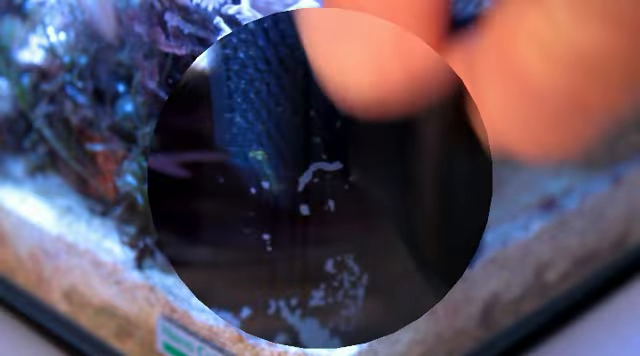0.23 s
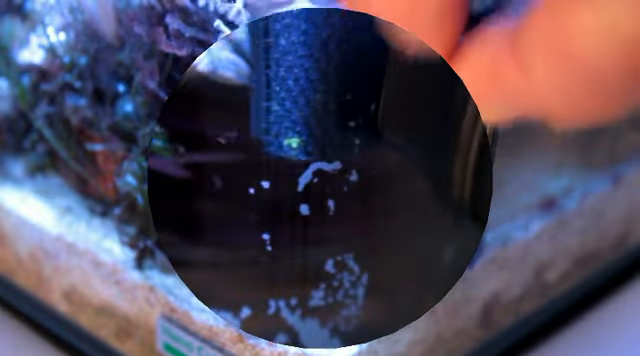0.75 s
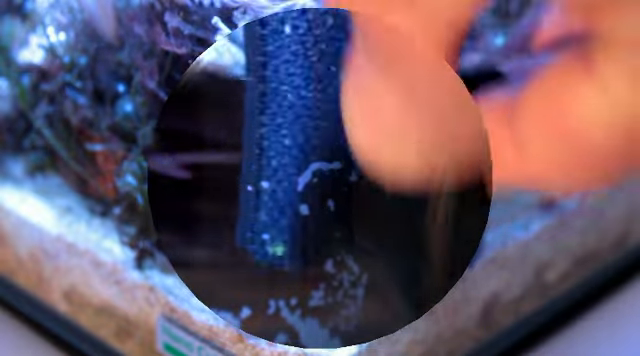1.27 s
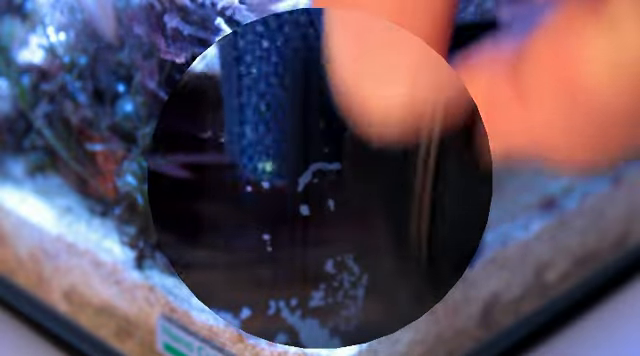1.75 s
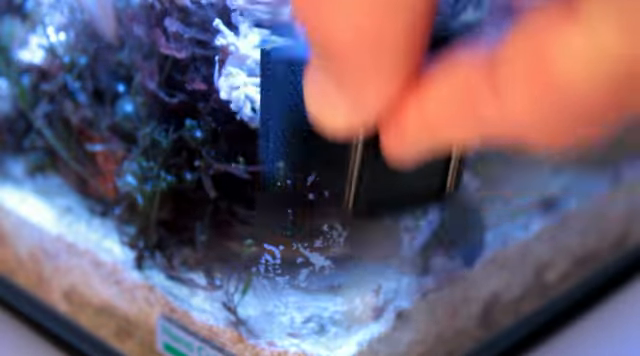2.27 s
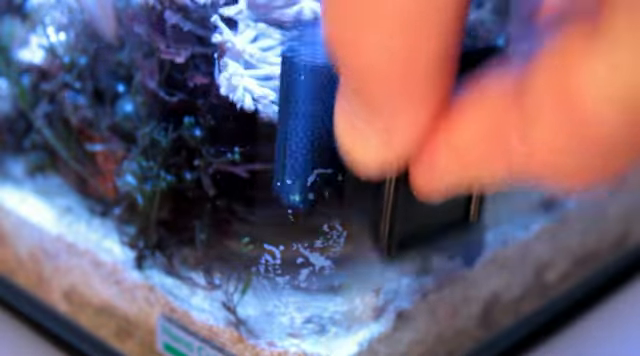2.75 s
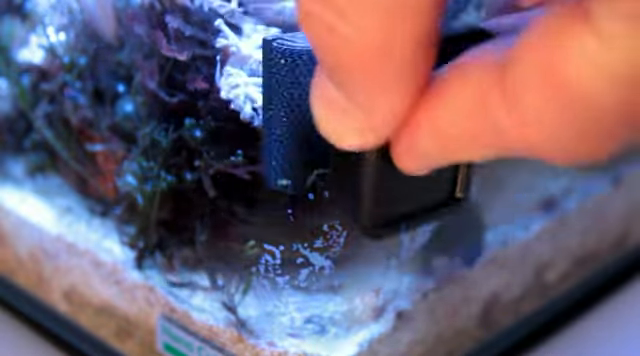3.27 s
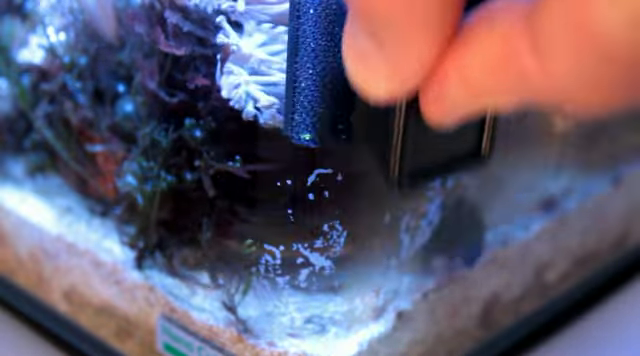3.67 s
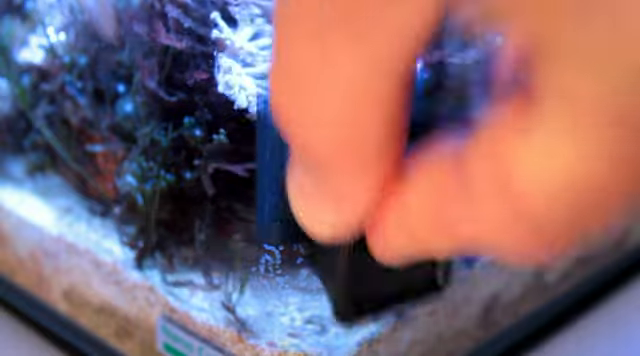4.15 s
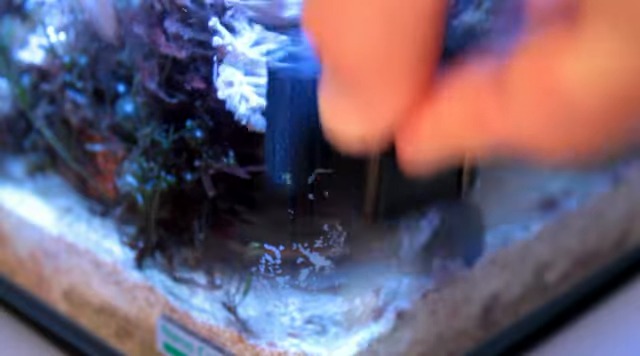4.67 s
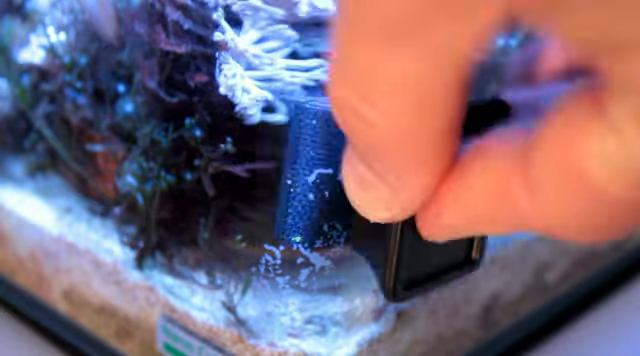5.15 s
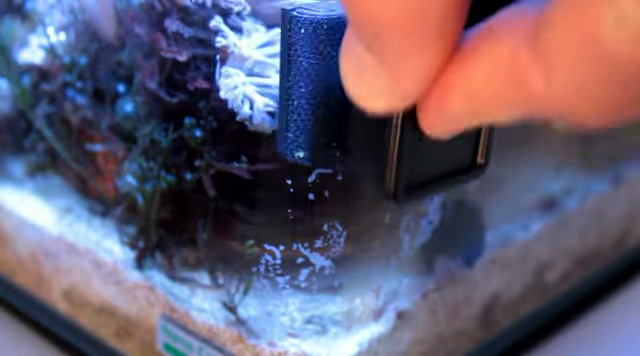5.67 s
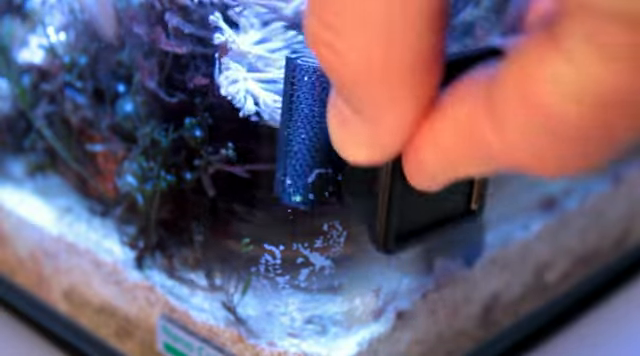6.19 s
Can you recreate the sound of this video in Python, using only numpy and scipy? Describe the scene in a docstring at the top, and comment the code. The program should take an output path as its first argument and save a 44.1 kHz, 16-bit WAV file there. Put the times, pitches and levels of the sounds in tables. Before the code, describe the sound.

A magnetic cleaner rasps in quick, crunchy strokes over crusted aquarium glass, pausing for low juddering drags and water plops, above a soft pump hum.

```python
"""An aquarium pane, heard close by, with a small magnetic cleaner working up and down it.
Each quick stroke bites, crushes hard algae crust in a short rasp of tiny fractures and rebounds.
Chips snap off as noise bursts, and band-pass modes let the glass ring briefly.
Midway the magnet drags slowly: stick and slip shakes low tank modes, and the pad rubs and squeaks.
A few drops plop as decaying, rising sines; a pump hums in steady sines under the hiss of the room."""
import sys
import numpy as np
from scipy import signal
from scipy.fft import rfft, irfft
from scipy.io import wavfile
from scipy.ndimage import uniform_filter1d

SR = 44100
rng = np.random.default_rng(int(sys.argv[2]) if len(sys.argv) > 2 else 0)


def master(y):
    """Save y as 16-bit WAV."""
    cut = np.clip(np.atleast_2d(y).T, -1, 1)
    pcm = np.round(cut * 32767)  # scale
    wavfile.write(sys.argv[1], SR, pcm.astype(np.int16))


N = 283428
T = np.arange(N) / SR

# slow drags of the magnet: (middle [s], half-power length [s], relative rasp level [dB], judder level [dB])
DRAGS = [(2.568, .06, -59, -56), (2.708, .04, -54, -61), (3.038, 0.053, -57.5, -68),
         (3.128, 0.059, -50, -46), (3.28, 0.12, -62.5, -57), (3.627, 0.038, -52, -50),
         (3.685, 0.049, -44, -44.5)]


def undb(db):
    """Level to amplitude: 20 dB is a factor of ten."""
    return 10 ** (np.asarray(db) / 20)


def unit(x):
    """Normalisation to a root-mean-square of 1."""
    return x / np.sqrt(np.mean(x ** 2))


def noise():
    """White noise: independent Gaussian samples, equal power at all frequencies."""
    return rng.standard_normal(N)


def walk(rate):
    """Slow random modulation of rms 1: smoothed random steps, rate per second."""
    size = int(SR / rate)
    steps = np.repeat(rng.standard_normal(N // size + 1), size)
    return unit(uniform_filter1d(steps, size)[:N])


def through(x, response):
    """Linear filtering: convolution with an impulse response scaled to unit energy."""
    return signal.fftconvolve(x, response / np.linalg.norm(response))[:N]


def colour(points, size=1024):
    """Minimum phase: the folded cepstrum turns a (frequency [Hz], level [dB]) curve into a causal response."""
    hz, db = np.transpose(points)
    bins = np.fft.rfftfreq(size, 1 / SR)
    log_gain = np.log(undb(np.interp(np.log(bins + 1), np.log(hz), db)))
    cepstrum = irfft(log_gain)[:size // 2]
    cepstrum[1:] *= 2
    response = irfft(np.exp(rfft(cepstrum, size)))
    return response / np.linalg.norm(response)


def fade(t, t60):
    """Exponential decay of a damped system, 60 dB down after t60 seconds."""
    return np.exp(-np.log(1000) * t / t60)


def swell(middle, length, db):
    """Gaussian envelope of one pass; length is its full width at half power."""
    return undb(db) * .5 ** (2 * ((T - middle) / length) ** 2)


def strokes(rows):
    """Power addition: the joint envelope of several independent passes."""
    return np.sqrt(sum(swell(*row) ** 2 for row in rows))


def drag_effort():
    """Envelope of the slow drags, their powers added."""
    return strokes([(middle, length, db) for middle, length, db, _ in DRAGS])


def grains(rate, spread_db):
    """Shot noise: tiny fractures at random moments, of either sign and uneven size; rms 1."""
    size = undb(spread_db * np.clip(noise(), -2, 2))
    happens = rng.random(N) < rate / SR
    return unit(happens * size * np.sign(noise()))


def burst(t60):
    """Transient: up to 25 ms of exponentially decaying noise, of unit energy."""
    t = T[:SR // 40]
    x = rng.standard_normal(len(t)) * fade(t, t60)
    return x / np.linalg.norm(x)


def resonance(x, hz, width):
    """One damped mode: a second-order band-pass with gain 1 at its centre."""
    return signal.lfilter(*signal.iirpeak(hz, hz / width, fs=SR), x)


def add(out, s, sound):
    """Superposition: mix a sound in from time s."""
    part = out[max(int(s * SR), 0):][:len(sound)]
    part += sound[:len(part)]


def room(x, wet_db, t60):
    """Reverberation: direct sound plus a short, diffuse wash from the tank and nearby walls."""
    t = T[:SR // 2]
    build_up = 1 - np.exp(-t / 0.00051)
    wash = rng.standard_normal(len(t)) * fade(t, t60) * build_up
    return x + undb(wet_db) * through(x, wash)


def scraping(crumble_db, chip_db, snap_t60, coarse_hz, catch_db, contact_db):
    """Brittle fracture: strokes and drags crush crust and chips snap off, all exciting the pane's modes."""
    # quick strokes, about six a second while they last; each peaks one length after its start:
    # (start [s], half-power length [s], relative level [dB], relative rebound level [dB])
    # a rebound near -66 is lost in the room hiss
    stroke_table = [(0, 0.0057, -40, -43), (0.129, 0.023, -49.5, -51.5), (0.314, 0.016, -45.5, -54),
                    (0.447, 0.025, -37.5, -44.5), (0.621, 0.02, -40.5, -39), (0.797, 0.021, -41.5, -46.5),
                    (0.97, .018, -43.5, -60.5), (1.11, 0.023, -40.5, -53), (1.288, 0.019, -41.5, -73),
                    (1.447, 0.015, -46.5, -72), (1.611, 0.018, -41, -60), (1.901, .008, -41.5, -66),
                    (3.776, 0.021, -45.5, -49.5), (4.005, 0.028, -40.5, -54), (4.155, 0.016, -37.5, -51),
                    (4.297, .019, -42, -42), (4.458, 0.02, -37.5, -47), (4.596, 0.021, -41, -52),
                    (4.738, 0.018, -41, -65), (4.857, 0.02, -44.5, -58), (5.002, 0.02, -42.5, -44),
                    (5.153, 0.022, -40, -48), (5.313, .018, -40.5, -41), (5.477, 0.013, -50.5, -70),
                    (5.946, 0.018, -49, -62), (6.009, 0.016, -46, -76), (6.125, .018, -52.5, -73),
                    (6.316, 0.017, -50, -73.5)]
    # the clearest snaps: chips of crust snapping off, and the sharper bites of some rebounds: (time [s],
    # relative level [dB])
    chips = [(1.037, -51.5), (1.185, -48), (1.296, -44.5), (1.836, -52), (1.886, -49.5), (2.524, -48),
             (2.727, -44), (2.855, -54), (3.094, -49), (3.111, -48), (3.147, -42.5), (3.269, -45.5),
             (3.492, -52.5), (3.649, -38.5), (4.081, -47), (4.217, -44), (4.662, -43.5), (4.757, -38),
             (4.867, -41), (5.372, -40), (5.479, -43), (5.863, -47.5), (6.128, -47)]
    # spectrum of crumbling crust heard through the pane: (frequency [Hz], relative level [dB])
    crust_spectrum = [(300, -27), (1000, -31), (1600, -14.5), (2100, -8), (3100, -4), (3800, -1.5),
                      (4080, -3), (4400, 4.5), (5000, 3.5), (6300, -2), (6900, -8.5), (8000, -9),
                      (11000, -12.5), (16000, -17)]
    # modes of the pane and blade: (frequency [Hz], mean gain on the rasp [dB], width [Hz])
    pane_modes = [(2093, 4, 30), (2464, 5.5, 39), (2600, -26, 18), (3060, -1.5, 170), (3590, -12, 35),
                  (3850, -9, 83), (4280, 0.5, 67), (4690, -47, 110), (4960, -21, 120), (6280, -2, 137),
                  (7770, -6, 110)]
    bite_db = -5  # snap as the edge bites, relative to its pass
    rebound_lag_s, rebound_s = .05, 0.014  # delay after the peak, and length of the second rasp
    stroke_coarse_db, drag_coarse_db = 1.3, -2  # quick strokes break coarser crust than slow drags
    flakes_per_s, flake_db = 70, -7  # smaller flakes break at random, relative to the crumbs

    # the edge catches and lets go every few milliseconds
    crumbs = unit(grains(rate=4000, spread_db=2.0) * undb(catch_db * walk(300)))
    flakes = through(grains(rate=flakes_per_s, spread_db=0.5), burst(snap_t60))
    crumbs += undb(flake_db) * flakes
    low_pass = signal.butter(3, coarse_hz, fs=SR, output="sos")
    coarse = signal.sosfiltfilt(low_pass, crumbs)
    fine = crumbs - coarse

    passes = [(s + length, length, db) for s, length, db, _ in stroke_table]
    passes += [(s + length + rebound_lag_s, rebound_s, db) for s, length, _, db in stroke_table]
    quick, slow = strokes(passes), drag_effort()
    force = fine * np.hypot(quick, slow)
    force += coarse * np.hypot(undb(stroke_coarse_db) * quick, undb(drag_coarse_db) * slow)
    force *= undb(crumble_db)

    # every quick pass and rebound opens with a snap, one length before its peak
    bites = [(middle - length, db + bite_db) for middle, length, db in passes]
    for s, db in [*bites, *chips]:
        add(force, s, undb(db + chip_db) * burst(snap_t60))

    rasp = through(force, colour(crust_spectrum))
    # as the blade travels, each mode gets a changing share
    ringing = sum(undb(db + contact_db * walk(6.5)) * resonance(rasp, hz, width)
                  for hz, db, width in pane_modes)
    return rasp + ringing


def pump(waver_db, waver_phase):
    """Periodic forcing: mains harmonics and rotor tones, wavering with the load on the impeller."""
    # hum of the pump: (frequency [Hz], mean peak level [dB])
    hum_tones = [(100, -70), (150, -63.5), (200, -48), (232.5, -67.5), (250, -66.5), (300, -63.5),
                 (400, -68.5), (602.5, -72.5)]
    hum = 0
    for hz, db in hum_tones:
        strength = undb(db + waver_db * walk(9))
        phase = 2 * np.pi * (hz * T + rng.random()) + waver_phase * walk(5)  # [rad]
        hum = hum + strength * np.sin(phase)
    return hum


def air(flicker_db):
    """Broadband turbulence: filtered noise as the wash of circulating water and room hiss."""
    # running water and room air: (frequency [Hz], relative level [dB])
    air_spectrum = [(20, -12), (40, -25.5), (58, -1), (75, -13.5), (125, -0.5), (160, -5.5), (205, 2.5),
                    (280, -6.5), (420, -10.5), (750, -14), (1400, -17), (4200, -18.5), (8000, -21.5),
                    (16000, -25)]
    air_db = -55  # level about which it flickers
    wash = unit(through(noise(), colour(air_spectrum, size=8192)))
    return undb(air_db + flicker_db * walk(14)) * wash


def brushing(patchy_db):
    """Sliding friction: patchy fine grains from the soft pad, band-passed for each drag, rub and squeak."""
    # the pad squeaks thinly: (middle [s], half-power length [s], level [dB], centre [Hz])
    squeaks = [(.223, 0.022, -53.5, 11800), (1.66, 0.015, -53, 8500), (2.127, .014, -54.5, 10000),
               (2.69, 0.03, -56, 7700), (3.848, 0.032, -50, 7260)]
    # the pad rubs over the pane: (middle [s], half-power length [s], level [dB], centre [Hz])
    rubs = [(.91, 0.065, -50, 1190), (1.2, 2.3, -64, 480), (1.237, 0.053, -54.5, 1230),
            (1.355, 0.06, -54, 1280), (1.463, 0.019, -53, 550), (3.04, 0.045, -56.5, 550)]
    rub_width, squeak_width = 0.62, 0.33  # width of each band-pass as a share of the centre
    grind_hz, grind_width_hz, grind_db = 1960, 1060, -8  # the pad grinds along with each drag
    hiss_hz, hiss_width_hz, hiss_db = 10200, 7000, -12.5  # and hisses finely

    friction = grains(rate=2000, spread_db=0.0) * undb(patchy_db * walk(110))

    def band(hz, width):
        """Cascaded resonance: two equal band-passes select one band of the friction; rms 1."""
        return unit(resonance(resonance(friction, hz, width), hz, width))

    grind = undb(grind_db) * band(grind_hz, grind_width_hz)
    hiss = undb(hiss_db) * band(hiss_hz, hiss_width_hz)
    out = drag_effort() * (grind + hiss)
    for touches, share in (rubs, rub_width), (squeaks, squeak_width):
        for middle, length, db, hz in touches:
            out += swell(middle, length, db) * band(hz, share * hz)
    return out


def water(rise, onset_s, splash_db, splash_t60):
    """Bubble resonance: each drop splashes and traps a bubble that rings and climbs a little in pitch."""
    # drops and bubbles in the water: (time [s], relative level [dB], starting pitch [Hz])
    drop_table = [(1.684, -40, 4420), (1.807, -49.5, 1990), (1.993, -47, 3550), (2.047, -50, 550),
                  (2.096, -48.5, 960), (2.122, -50, 2260), (3.493, -37, 3180), (3.831, -31, 816),
                  (5.73, -45.5, 3900), (5.731, -49, 2260), (5.958, -41, 3180), (6.32, -45, 2250)]
    bubble_cycles = 39.5  # periods of the starting pitch per 60 dB of decay: small bubbles die sooner
    out, t = np.zeros(N), T[:SR // 4]
    for s, db, hz in drop_table:
        t60 = bubble_cycles / hz
        age = np.minimum(t / t60, 1.5)
        pitch = hz * (1 + rise * age)
        # damping grows as the bubble nears the surface, so the note holds and then dies fast
        size = fade(t * age, t60) * (1 - np.exp(-t / onset_s))
        note = np.sin(2 * np.pi * np.cumsum(pitch) / SR)
        add(out, s, undb(db) * size * note)
        # the splash lies just above the bubble's starting note
        splash_band = signal.butter(3, [hz, hz + 900], "band", fs=SR, output="sos")
        splash = signal.sosfilt(splash_band, burst(splash_t60))
        add(out, s, undb(db + splash_db) * splash)
    return out


def dragging():
    """Stick-slip: irregular slips of the magnet excite the low modes of the whole tank."""
    # modes that the judder shakes: (frequency [Hz], relative gain [dB], width [Hz])
    tank_modes = [(44.6, -25, 10), (61.3, 3.5, 6.4), (125.3, 12, 4.4), (176, 7, 10.4), (213.3, -0.5, 4.6),
                  (360, -21, 14)]
    lag_s, stretch = 0.015, 1.8  # the judder builds up later and outlasts the rasp
    slips = grains(rate=470, spread_db=0.5)
    shake = sum(undb(db) * resonance(slips, hz, width) for hz, db, width in tank_modes)
    judder = strokes([(middle + lag_s, length * stretch, db) for middle, length, _, db in DRAGS])
    # the slowest sway of the tank radiates no sound
    high_pass = signal.butter(4, 40, "high", fs=SR, output="sos")
    return judder * unit(signal.sosfilt(high_pass, shake))


def scene():
    """Superposition of the cleaner and the drops over the steady hum and hiss."""
    rasp = scraping(crumble_db=-1.5, chip_db=21.5, snap_t60=0.023, coarse_hz=4070,
                    catch_db=2.5, contact_db=1.7)
    cleaner = room(rasp, wet_db=-6.5, t60=0.11) + dragging() + brushing(patchy_db=2.5)
    drops = water(rise=0.14, onset_s=0.00074, splash_db=21.5, splash_t60=.025)
    drops = room(drops, wet_db=-15, t60=.25)
    background = pump(waver_db=0.93, waver_phase=0.037) + air(flicker_db=1.2)
    return (cleaner + drops + background)[None]


def record(dry):
    """Band limitation: a steep elliptic low-pass removes the treble above 15.8 kHz."""
    low_pass = signal.ellip(10, .2, 70, 15800, fs=SR, output="sos")
    return signal.sosfilt(low_pass, dry)


dry = scene()
out = record(dry)
master(out)
```